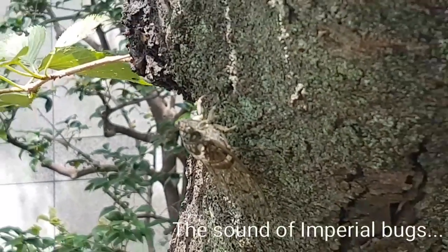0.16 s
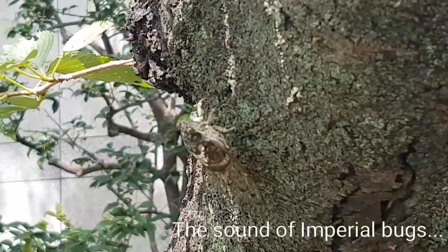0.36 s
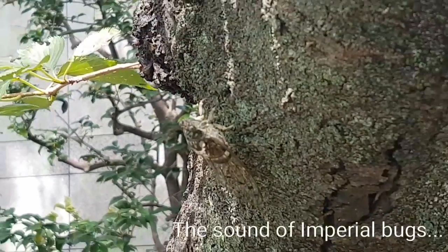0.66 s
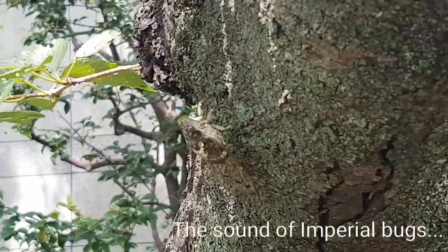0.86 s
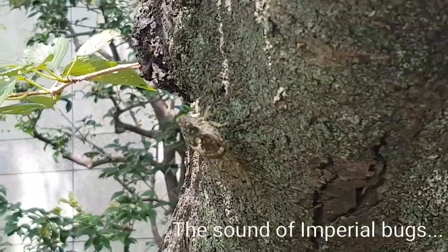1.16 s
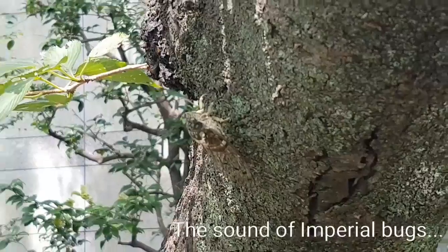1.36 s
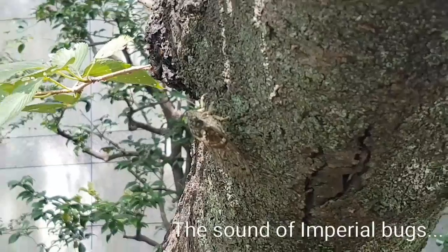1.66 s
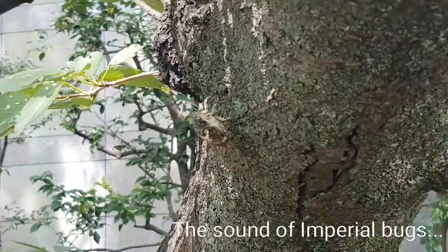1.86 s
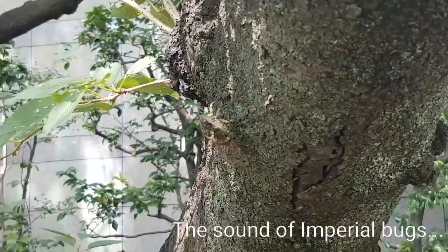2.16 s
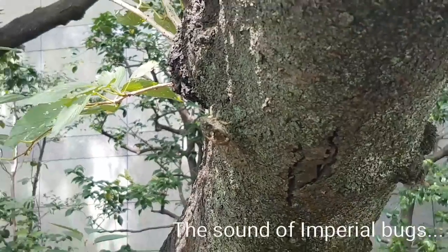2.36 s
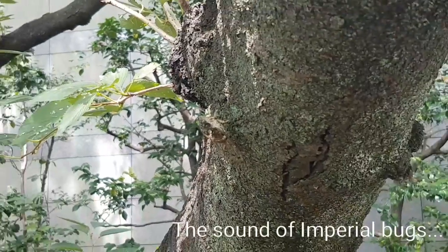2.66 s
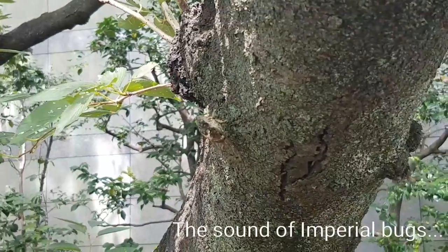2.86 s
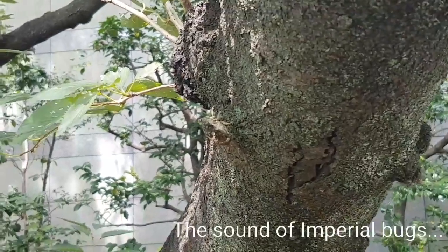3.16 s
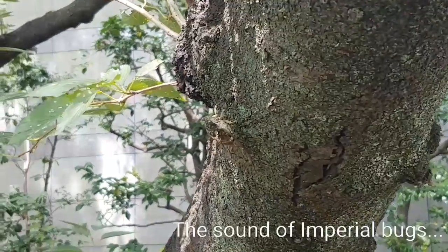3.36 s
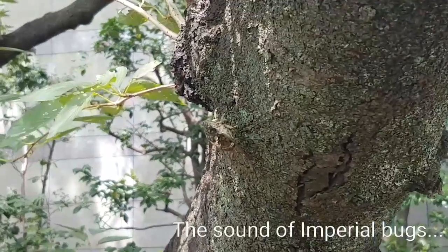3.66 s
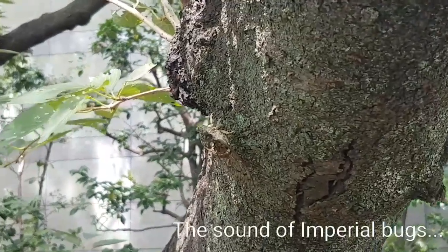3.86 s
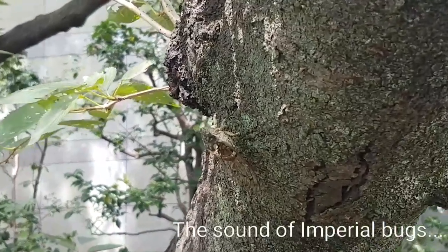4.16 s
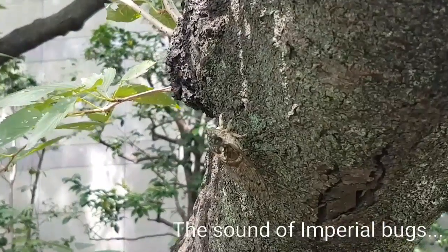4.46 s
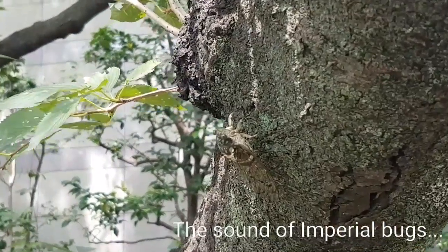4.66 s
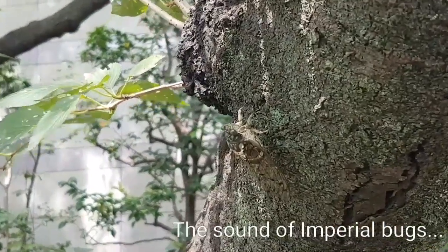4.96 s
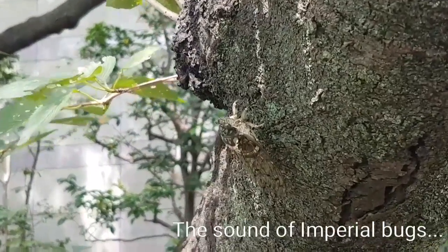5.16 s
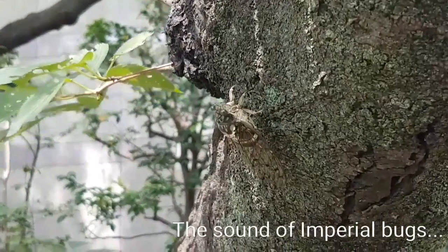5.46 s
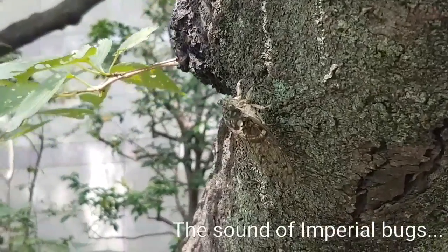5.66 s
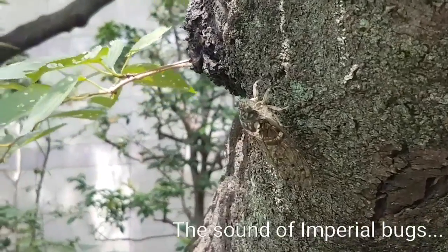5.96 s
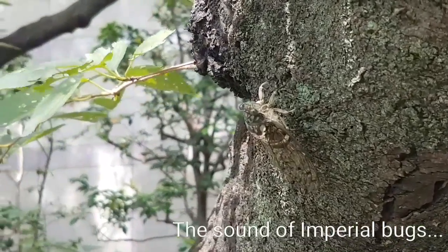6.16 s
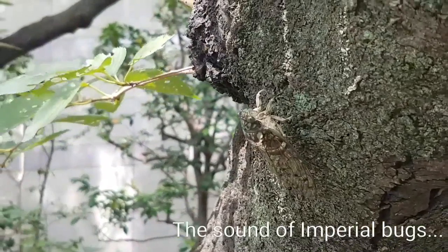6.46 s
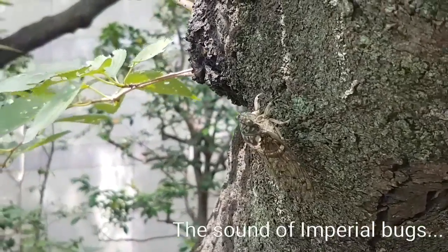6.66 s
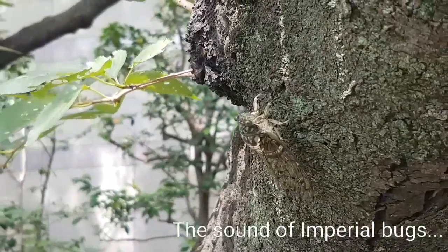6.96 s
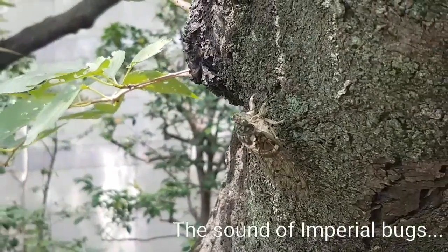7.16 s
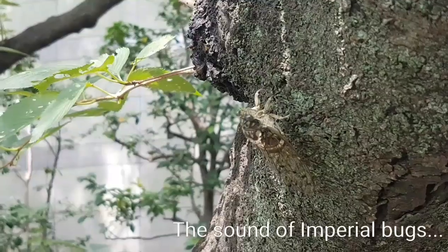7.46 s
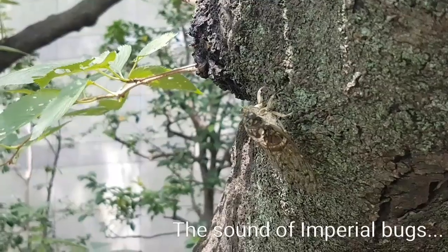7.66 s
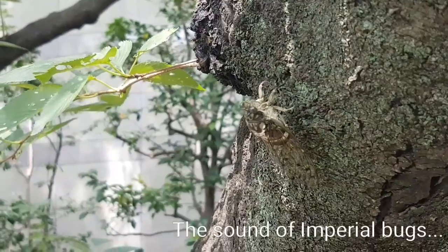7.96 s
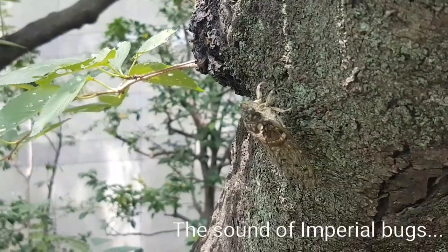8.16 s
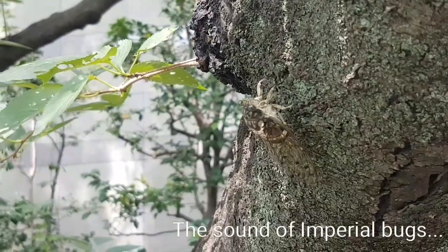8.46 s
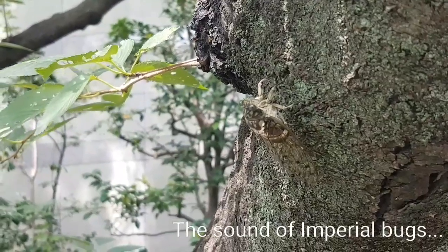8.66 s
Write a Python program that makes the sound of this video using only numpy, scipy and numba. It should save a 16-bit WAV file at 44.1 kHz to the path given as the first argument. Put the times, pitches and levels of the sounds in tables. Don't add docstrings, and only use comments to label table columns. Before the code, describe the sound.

A cicada close by buzzes without pause, its slow rattling whine rising to loud piercing swells then short high chirps, over faint town traffic.

```python
import sys
import numpy as np
from scipy import signal
from scipy.fft import rfft, irfft
from scipy.io import wavfile
from scipy.ndimage import uniform_filter1d
from numba import njit

SR = 44100
rng = np.random.default_rng(int(sys.argv[2]) if len(sys.argv) > 2 else 0)


def volts_from_decibels(level):
    exponent = np.asarray(level, float) / 20
    return 10 ** exponent


def materialize(psi):
    bounded = np.clip(np.atleast_2d(psi).T, -1, 1)
    quanta = np.round(bounded * 32767).astype(np.int16)
    wavfile.write(sys.argv[1], SR, quanta)


N = 388521

# climb_s, drop_s, sag_s, top_rate_hz
MUSCLE_PHRASES = [
    (0.0, .99, 1.6, 173.8),
    (3.99, 5.055, 5.635, 171.1),
    (7.71, 8.38, 8.96, 172.0),
]
# from_climb_s, share_of_top_rate
WIND_UP = [(-1.18, .43), (-1.03, .47), (-.72, .665), (-.58, .695), (-.2, .755), (-.08, .8), (.12, .935),
           (.24, .975), (.45, 1.0)]
# from_drop_s, share_of_top_rate
DROP = [(-.42, 1.0), (-.2, .975), (-.08, .935), (.06, .822), (.14, .81), (.3, .79)]
# from_sag_s, muscle_hz
SAG = [(-.5, 142), (-.29, 136), (0, 115), (.35, 92.5), (.6, 81.5), (.8, 76), (1.0, 74)]
STEADY_FROM_HZ, STEADY_SPAN_HZ, LOOSE_MS, STEADY_MS = 155, 11, .045, .006

# time_s, sac_level_db, sac_pitch_hz
SWELLS = [
    [(-.1, -23, 4060), (.0, -23, 4060), (.07, -26.5, 3430), (.26, -28.5, 2780), (.4, -46, 2900)],
    [(1.8, -38.5, 2820), (2.55, -31, 3240), (3.12, -30.5, 3577), (3.34, -22.5, 3820), (3.58, -25.5, 3800),
     (3.75, -20, 3940), (4.08, -17.5, 4200), (4.24, -26, 2880), (4.38, -42.5, 2930)],
    [(5.5, -38, 3050), (6.09, -33, 3130), (6.84, -27.5, 3510), (7.07, -20.5, 3758), (7.44, -18, 3815),
     (7.8, -14, 4350), (7.88, -13.5, 3960), (7.95, -21.5, 3270), (8.1, -41, 3050)],
]
# start_s, length_s, sac_level_db, rise_db, end_pitch_hz
LIFTS = [
    (0.31, 0.24, -17.5, 4, 4690),
    (0.954, 0.09, -25.5, 2, 4110),
    (4.44, 0.17, -20.5, 3.5, 4590),
    (5.011, 0.12, -25, 1.5, 4220),
    (8.271, .14, -22.5, -0.7, 3970),
]
OPEN_DB_PER_S, SHUT_DB_PER_S, OPEN_S, SHUT_S, HZ_PER_DB = 396, 193, 0.029, 0.091, 164
SHUT_HZ, SWELL_FROM_HZ, SWELL_SPAN_HZ = 3050, 3310, 517
# muscle_hz, level_db
MURMUR = [(110, -42), (140, -41), (160, -43.5), (168, -52.5)]
MURMUR_GAIN_DB_PER_S = 0.89

# muscle_hz, share_of_cycle
FAR_LAG = [(75, .425), (90, .5), (115, .455), (140, .475), (170, .487)]
RING_DB, RING_SWELL_DB, RING_LIFT_DB = -10.5, 15, 10
RATTLE, RATTLE_SWELL, RATTLE_LIFT = 0.2, 0.22, 0.17
# pitch_hz, width_hz, level_db
WALL_MODES = [(2230, 4500, -35), (4930, 1740, -7.5), (5950, 3060, -11.5)]

# pitch_hz, width_hz, level_db
RIB_MODES = [(11690, 2250, -3.5), (13400, 2130, 1), (14160, 1110, 4)]
# muscle_hz, level_db
RIB_LEVEL = [(75, -29), (95, -27), (140, -24.5), (170, -24)]
# muscle_hz, level_db
SNAP = [(75, -1), (92, -5), (120, -11), (170, -15)]
RIB_SWELL_DIP_DB, RIB_LIFT_DIP_DB = 6, 12
# time_s, rib_level_db, rib_left_right_db, far_tymbal_db
AIM = [(0, -2, 4.5, 0.5), (.8, 1, 5.5, -6), (1.6, -1, 5, -25), (2.8, 0.3, 7, -4), (3.7, -2.5, 4, 11),
       (4.3, -0.5, 2, 0), (5.5, -2, 1.5, -10.5), (6.3, -5.5, .2, 10), (7.5, -1, 1, 15),
       (8.81, -7, .5, -0.5)]

# pitch_hz, width_hz, level_db
BODY_MODES = [(463, 470, -2.5), (1140, 560, -7), (1970, 1230, -1.5), (4200, 8030, -3.5), (5540, 6270, 1.5)]
# muscle_hz, level_db
THUMP = [(75, -50.5), (100, -48), (140, -43.5), (170, -40.5)]
THUMP_SWELL_DIP_DB, THUMP_LIFT_DIP_DB = 7.5, 29.5

# pitch_hz, level_db (per Hz)
CHORUS = [(1700, -23), (2200, -30), (3400, -18), (5000, 36.5), (6300, 7), (8000, -11.5), (9500, 26),
          (11500, -8), (14000, -24)]
CHORUS_DB = -45
# pitch_hz, likeness (0-1)
LIKENESS = [(30, 0.38), (80, 0.95), (300, 0.54), (700, 0.028), (1500, 0.43), (14000, 0.42)]

# pitch_hz, level_db (per Hz)
RUMBLE = [(15, -47), (25, -11), (54, -4), (86, 0), (118, 3), (264, -1), (318, -2.5), (500, -7), (650, -69),
          (1100, -120)]
# pitch_hz, level_db (per Hz)
WASH = [(250, -17), (400, -14), (600, -0.5), (1000, 2), (1600, -6), (2400, 2.5), (4000, 7)]
# time_s, road_level_db
ROAD = [(0, -37), (.4, -37), (.8, -47.5), (2.0, -46.5), (2.67, -37.5), (3.4, -30.5), (4.2, -34.5),
        (4.38, -40), (4.9, -48.5), (6.3, -49), (7.3, -40.5), (7.9, -45.5), (8.1, -51.5), (8.81, -51.5)]
# time_s, level_db
WASH_SHARE = [(0, 7), (.8, 6.5), (1.9, 5.5), (3.4, 1.1), (5.5, 6), (7.0, 3.5), (7.45, 0), (7.65, -33),
              (8.45, -4), (8.7, 6.5)]
# time_s, hum_level_db
ENGINE = [(0, -51), (.7, -58), (1.1, -70), (2.0, -72), (2.65, -43.5), (4.22, -41), (4.45, -45),
          (4.86, -54.5), (5.1, -47.5), (6.2, -57), (7.0, -43), (7.9, -45.5), (8.15, -60), (8.81, -62)]
HUM_HZ, HUM_SAG_HZ_PER_S, HUM_WANDER_HZ = 94.4, 1.75, 0.79
FAN_HZ, FAN_DB = 565, -17

TONAL_DIP_DB = 6
# pitch_hz, floor_db (against the loudest higher band)
BAND_FLOOR = [(300, -60), (450, -41), (1700, -39), (2500, -40), (6000, -36), (7500, -28), (8500, -22),
              (9600, -22), (10400, -29), (11200, -50)]
CUTOFF_HZ = 14640


def rms_one(x):
    return x / np.sqrt(np.mean(x ** 2) + 1e-20)


def read(points, x):
    return np.interp(x, *np.transpose(points))


def in_time(rows):
    time_s, *columns = np.transpose(rows)
    return [np.interp(np.arange(N) / SR, time_s, column) for column in columns]


def at_hz(points, hz):
    points_hz, values = np.transpose(points)
    return np.interp(np.log(hz), np.log(points_hz), values)


def even(x):
    power = np.mean(np.atleast_2d(x), axis=0) ** 2
    smooth = uniform_filter1d(uniform_filter1d(power, size=1500), size=1500)
    return x / np.sqrt(smooth + 1e-14)


@njit
def glide(x, pull, damp):
    y = np.zeros(len(x))
    for i in range(2, len(x)):
        y[i] = (x[i] - x[i - 2]) * (1 - damp) / 2 + pull[i] * y[i - 1] - damp * y[i - 2]
    return y


def resonance(x, hz, width_hz):
    r = np.exp(-np.pi * width_hz / SR)
    return glide(x, 2 * r * np.cos(2 * np.pi * hz / SR) * np.ones(N), r * r)


def modes(x, table):
    total = 0
    for k, (hz, width_hz, db) in enumerate(table):
        ring = resonance(resonance(x, hz, width_hz), hz, width_hz)
        total = total + (-1) ** k * volts_from_decibels(db) * ring
    return total


def placed(x, pan_db, lead_us):
    turn = np.exp(1j * np.pi * np.fft.rfftfreq(N, 1 / SR) * lead_us * 1e-6)
    spectrum = rfft(x)
    left = irfft(spectrum * turn, N) * volts_from_decibels(pan_db / 2)
    right = irfft(spectrum / turn, N) * volts_from_decibels(-pan_db / 2)
    return np.array([left, right])


def banded_noise(spectrum, patchy_db):
    out, edges = 0, 22 * 2 ** np.arange(0, 9.6, .5)
    white = rng.standard_normal((2, 2, N))
    for k, (low, high) in enumerate(zip(edges, edges[1:])):
        hz = np.sqrt(low * high)
        if not spectrum[0][0] < hz < spectrum[-1][0]:
            continue
        band = signal.butter(2, [low, high], "band", fs=SR, output="sos")
        mid, side = signal.sosfilt(band, white[k % 2])
        alike = np.clip(at_hz(LIKENESS, hz), 0, 1)
        flicker = np.interp(np.arange(N), np.linspace(0, N, 60), rng.standard_normal(60))
        gain = volts_from_decibels(at_hz(spectrum, hz) + patchy_db * flicker)
        out = out + gain * (np.sqrt(1 + alike) * mid + np.sqrt(1 - alike) * side * [[1], [-1]])
    return rms_one(out)


def muscle():
    s = np.arange(N) / SR
    rates = []
    for climb, drop, sag, top_hz in MUSCLE_PHRASES:
        held_hz = top_hz * np.minimum(read(WIND_UP, s - climb), read(DROP, s - drop))
        sag_hz = np.where(s > drop, read(SAG, s - sag), top_hz)
        rates.append(np.minimum(held_hz, sag_hz))
    return uniform_filter1d(np.max(rates, axis=0), size=3000)


def steadiness(rate_hz):
    return np.clip((rate_hz - STEADY_FROM_HZ) / STEADY_SPAN_HZ, 0, 1)


def abdomen(rate_hz):
    s = np.arange(N) / SR
    sac_db = read(MURMUR, rate_hz) + MURMUR_GAIN_DB_PER_S * s
    sac_hz = np.full(N, float(SHUT_HZ))
    for rows in SWELLS:
        db, hz = in_time(rows)
        on = (s > rows[0][0]) & (s < rows[-1][0])
        sac_db = np.where(on, np.maximum(db, sac_db), sac_db)
        sac_hz = np.where(on, hz, sac_hz)
    swell = np.clip((sac_hz - SWELL_FROM_HZ) / SWELL_SPAN_HZ, 0, 1)
    lift = np.zeros(N)
    for start, length, db, rise_db, hz in LIFTS:
        early, late = np.maximum(start - s, 0), np.maximum(s - start - length, 0)
        short_db = rise_db * np.clip(1 - (s - start) / length, 0, 1)
        lift_db = db + rise_db - short_db - OPEN_DB_PER_S * early - SHUT_DB_PER_S * late
        sac_db = np.maximum(sac_db, lift_db)
        height = np.clip(1 - early / OPEN_S - late / SHUT_S, 0, 1)
        sac_hz = sac_hz + height * (hz - HZ_PER_DB * short_db - sac_hz)
        lift += np.sin(np.pi * np.clip((s - start + OPEN_S) / (length + OPEN_S + SHUT_S / 2), 0, 1))
    return uniform_filter1d(sac_db, size=600), uniform_filter1d(sac_hz, size=600), swell, lift


def buckles(phase, late_s, chance):
    at = np.flatnonzero(np.diff(np.floor(phase)) > 0)
    exact = at + 1 - (phase[at + 1] % 1) / (phase[at + 1] - phase[at]) + late_s[at] * SR
    taps = np.round(exact).astype(int)[:, None] + np.arange(-8, 9)
    offset = taps - exact[:, None]
    shape = np.sinc(offset) * np.cos(offset * np.pi / 18) ** 2
    clicks = np.zeros(N)
    np.add.at(clicks, np.clip(taps, 0, N - 1), shape * volts_from_decibels(0.23 * chance[:len(at), None]))
    return clicks


def tymbals(rate_hz, scatter_ms, swell, loose):
    phase, chance = np.cumsum(rate_hz) / SR, rng.standard_normal((4, 1600))
    near_s, far_s, near_slip, far_slip = scatter_ms * 0.0012 * rng.standard_normal((4, N))
    hold_s = .00225 - .000005 * rate_hz + (.00008 + .00022 * swell) * loose
    far_phase = phase - read(FAR_LAG, rate_hz) * (1 - swell * loose) - .497 * swell * loose
    near_in = buckles(phase, near_s, chance[0])
    near_out = buckles(phase, near_s + hold_s + .15 * near_slip, chance[1])
    far_in = buckles(far_phase, far_s, chance[2])
    far_out = buckles(far_phase, far_s + hold_s + .3 * far_slip, chance[3])
    held_share = hold_s * rate_hz + .02
    held = (phase % 1 < held_share) | (far_phase % 1 < held_share)
    held = .3 + .7 * uniform_filter1d(1. * held, size=14)
    return near_in, near_out, far_in, far_out, held


def rib_crackle(clicks, rattle):
    after = signal.lfilter([1], [1, -np.exp(-1 / (0.0047 * SR))], clicks)
    return np.clip(rattle, 0, 1) * after * rng.standard_normal((2, N))


def air_sac(inward, outward, held, crackle, sac_hz, ring_db, scatter_ms, swell, lift, loose):
    snap_db = -12 - ring_db / 3 + 4 * (1 - loose) * lift + 3 * swell
    push = inward - volts_from_decibels(snap_db) * outward + .03 * loose * crackle
    sac = resonance(resonance(push, sac_hz, 1200), sac_hz, 1400)
    sac += volts_from_decibels(ring_db + 8) * held * resonance(resonance(inward, 1.05 * sac_hz, 200), sac_hz, 1600)
    sac -= volts_from_decibels(-5.5) * swell * loose * resonance(outward, 4700, 4500)
    low_ring = resonance(resonance(push, 0.77 * sac_hz, 1280), 0.7 * sac_hz, 1050)
    sac -= volts_from_decibels(-10.5 + 213 * scatter_ms + 0.32 * ring_db) * low_ring
    wall_push = volts_from_decibels(-18.0) * inward - outward + 0.11 * loose * crackle
    sac += volts_from_decibels(-1.5 + 60 * scatter_ms) * modes(wall_push, WALL_MODES)
    return signal.sosfilt(signal.butter(3, [1600, 7600], "band", fs=SR, output="sos"), sac)


def rib_ring(near, far, longest, pan_db):
    ribs = placed(modes(near, RIB_MODES), pan_db, lead_us=72.0)
    ribs += placed(modes(far, RIB_MODES), pan_db, lead_us=27.8)
    ribs += placed(longest, pan_db, lead_us=66.5)
    return signal.sosfilt(signal.butter(4, 9800, "high", fs=SR, output="sos"), ribs)


def cicada():
    rate_hz = muscle()
    sac_db, sac_hz, swell, lift = abdomen(rate_hz)
    aim_db, rib_pan_db, far_db = in_time(AIM)
    loose = 1 - steadiness(rate_hz)
    scatter_ms = STEADY_MS + (LOOSE_MS - STEADY_MS) * loose
    ring_db = RING_DB + RING_SWELL_DB * swell + RING_LIFT_DB * lift * loose
    rattle = (RATTLE + RATTLE_SWELL * swell + RATTLE_LIFT * lift) * (0.75 + 0.38 * loose)
    rib_db = aim_db + read(RIB_LEVEL, rate_hz) - RIB_SWELL_DIP_DB * swell - RIB_LIFT_DIP_DB * lift
    thump_db = read(THUMP, rate_hz) - THUMP_SWELL_DIP_DB * swell - THUMP_LIFT_DIP_DB * lift
    swing_db_per_s = uniform_filter1d(np.abs(np.gradient(sac_db)) * SR, size=900)
    sac_hz = sac_hz * (1 - 0.23 * np.tanh(swing_db_per_s / 350))

    near_in, near_out, far_in, far_out, held = tymbals(rate_hz, scatter_ms, swell, loose)
    inward = near_in + volts_from_decibels(-1.5) * far_in
    outward = near_out + volts_from_decibels(-3) * far_out
    crackle = rib_crackle(inward + outward, rattle)
    sac = air_sac(inward, outward, held, crackle[0], sac_hz, ring_db, scatter_ms, swell, lift, loose)
    near = near_in - volts_from_decibels(read(SNAP, rate_hz)) * near_out
    far = volts_from_decibels(far_db) * (far_in - far_out) + 0.12 * crackle[1]
    longest = volts_from_decibels(ring_db + 2.0) * modes(0.31 * crackle[0] + outward, [(11360, 3000, -9.5)])
    ribs = rib_ring(near, far, longest, rib_pan_db)
    thump = modes(near_in + volts_from_decibels(-6.5) * far_in - volts_from_decibels(-28) * outward, BODY_MODES)

    song = placed(volts_from_decibels(sac_db) * even(sac), pan_db=-3.5, lead_us=38.0)
    song = song + volts_from_decibels(rib_db) * even(ribs)
    return song + placed(volts_from_decibels(thump_db) * even(thump), pan_db=8.0, lead_us=27)


def garden(song):
    s = np.arange(SR // 4) / SR
    tail = rng.standard_normal((2, len(s))) * volts_from_decibels(-60 * s / .1) * (s > .003)
    tail /= np.sqrt(np.sum(tail ** 2, axis=1, keepdims=True))
    return volts_from_decibels(-15) * signal.fftconvolve(song, tail, axes=1)[:, :N]


def far_chorus(dip_db):
    return volts_from_decibels(CHORUS_DB - dip_db) * banded_noise(CHORUS, patchy_db=2.5)


def traffic(dip_db):
    s = np.arange(N) / SR
    rumble_db = read(ROAD, s)
    wash_db = rumble_db + read(WASH_SHARE, s) - dip_db
    wander = np.interp(s, np.linspace(0, s[-1], num=40), rng.standard_normal(size=40))
    hum_hz = HUM_HZ - HUM_SAG_HZ_PER_S * s + HUM_WANDER_HZ * wander
    hum = volts_from_decibels(read(ENGINE, s)) * np.sqrt(2) * np.sin(2 * np.pi * np.cumsum(hum_hz) / SR)
    fan = rms_one(resonance(resonance(rng.standard_normal(N), FAN_HZ, 12.0), FAN_HZ, 12.0))
    wash = banded_noise(WASH, patchy_db=3.0) + volts_from_decibels(FAN_DB) * fan
    rumble = banded_noise(RUMBLE, patchy_db=1.5)
    return volts_from_decibels(rumble_db) * rumble + volts_from_decibels(wash_db) * wash + hum


def scene():
    song = cicada()
    dip_db = TONAL_DIP_DB * steadiness(muscle())
    return song + garden(song) + far_chorus(dip_db) + traffic(dip_db)


def low_pass(x):
    return signal.sosfilt(signal.butter(12, 15810, fs=SR, output="sos"), x)


def record(dry):
    hz, _, frames = signal.stft(dry, SR, nperseg=2048)
    size = np.abs(frames[:, :1020].mean(axis=0))
    bands = np.mean(size.reshape(85, 12, -1) ** 2, axis=1)
    centre_hz = hz[6:1020:12]
    loudest_above = np.maximum.accumulate(bands[::-1])[::-1]
    margin_db = at_hz(BAND_FLOOR, centre_hz)[:, None] + 5.0 * rng.standard_normal(bands.shape)
    limit = loudest_above * volts_from_decibels(margin_db) ** 2
    keep = np.repeat(bands > limit, 12, axis=0) * (hz[:1020, None] < CUTOFF_HZ)
    kept = signal.istft(frames * np.pad(keep, ((0, 5), (0, 0))), SR, nperseg=2048)[1][:, :N]
    mix = .95 * np.tanh(kept / .95)
    return low_pass(mix)


dry = scene()
out = record(dry)
materialize(out)
```